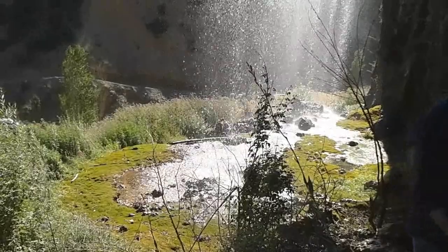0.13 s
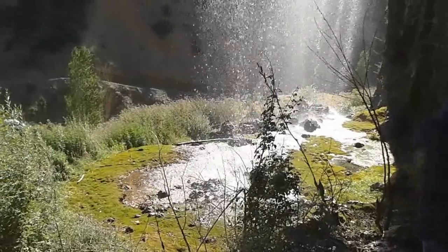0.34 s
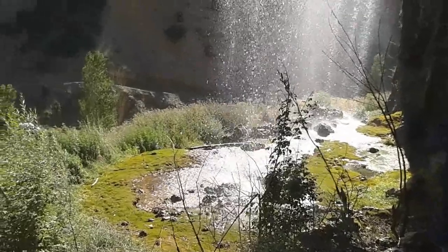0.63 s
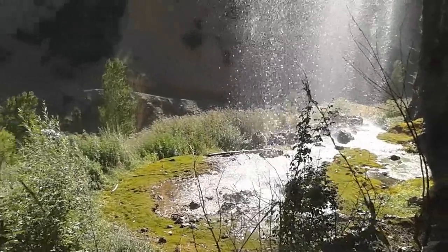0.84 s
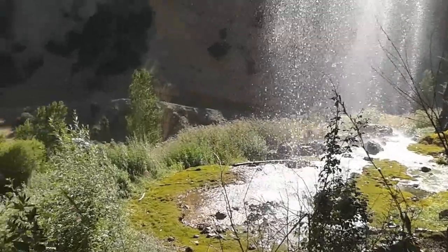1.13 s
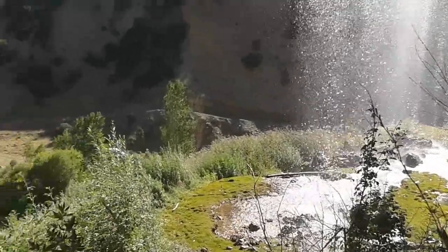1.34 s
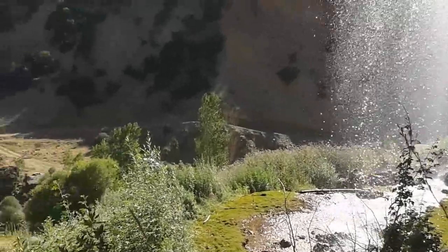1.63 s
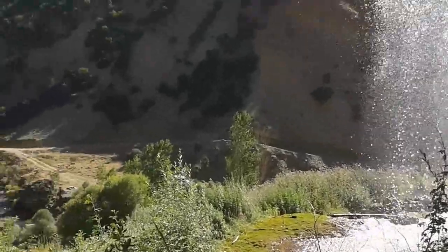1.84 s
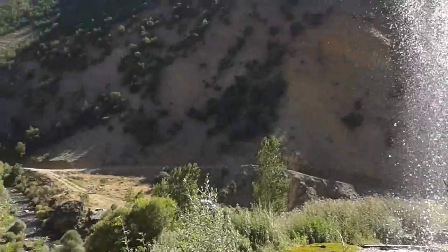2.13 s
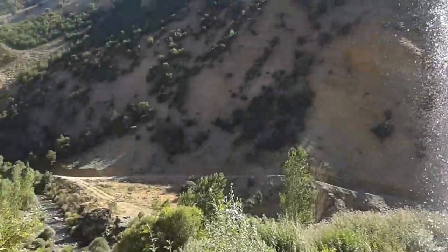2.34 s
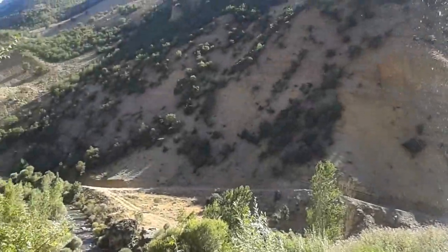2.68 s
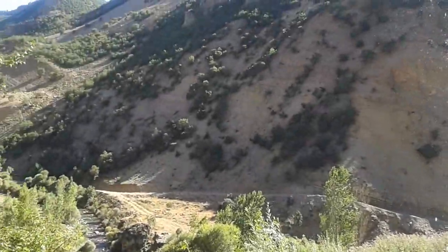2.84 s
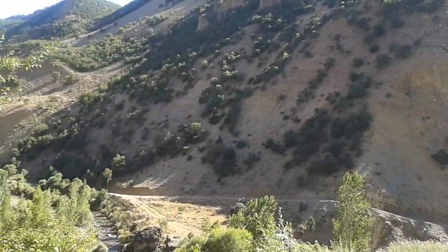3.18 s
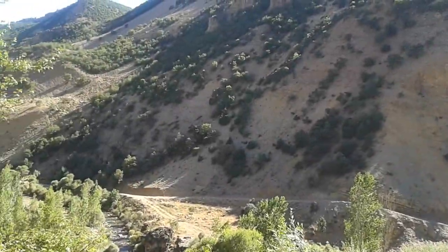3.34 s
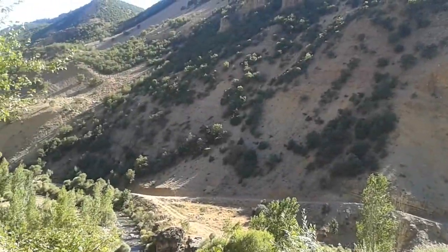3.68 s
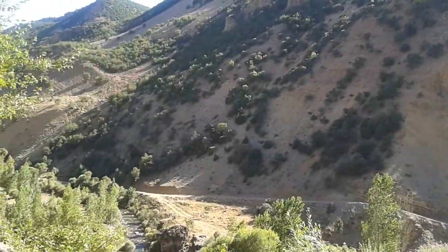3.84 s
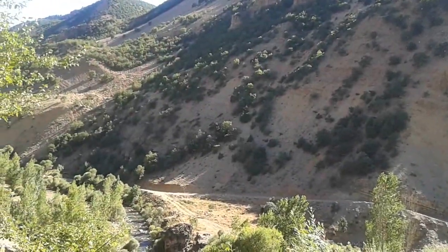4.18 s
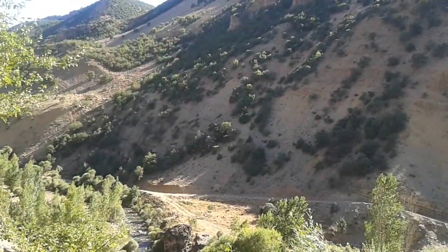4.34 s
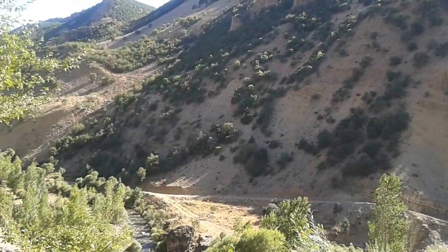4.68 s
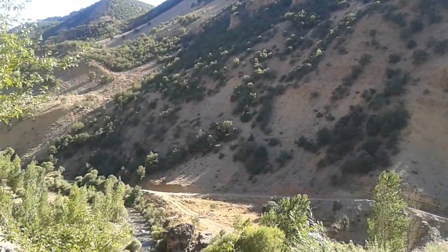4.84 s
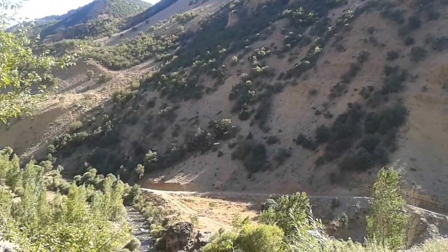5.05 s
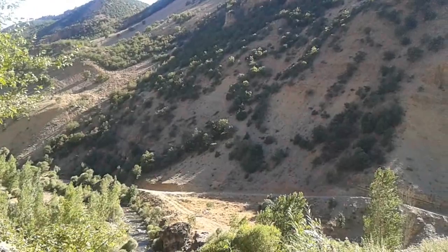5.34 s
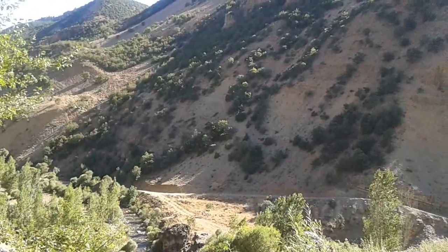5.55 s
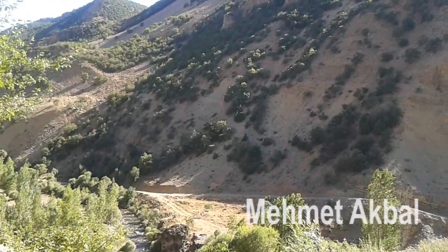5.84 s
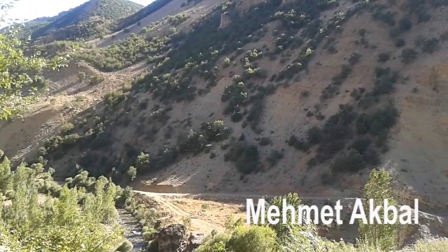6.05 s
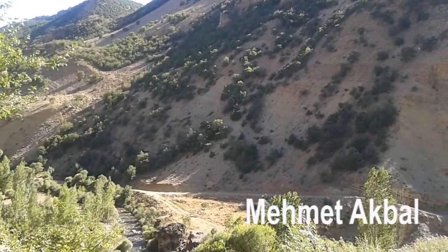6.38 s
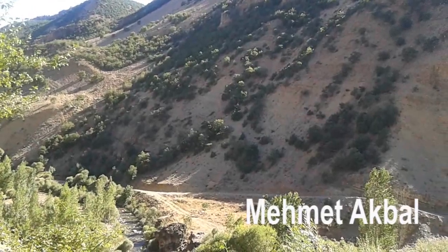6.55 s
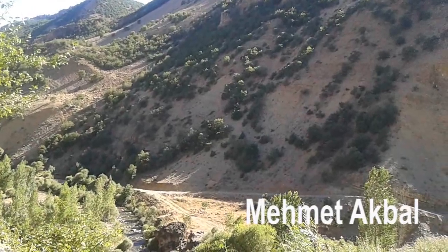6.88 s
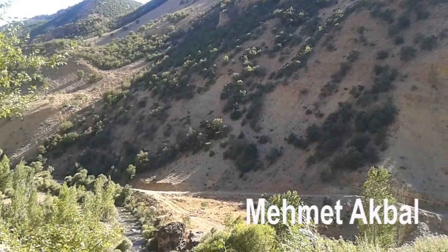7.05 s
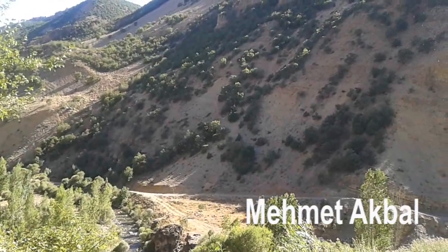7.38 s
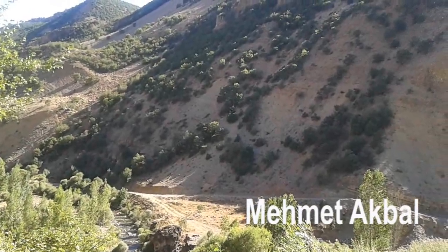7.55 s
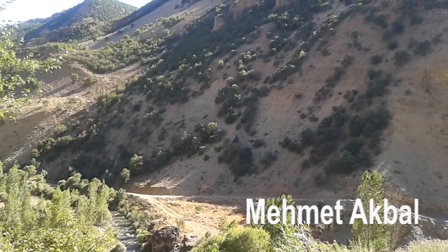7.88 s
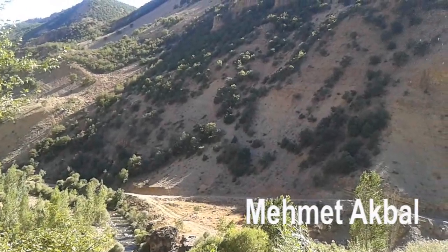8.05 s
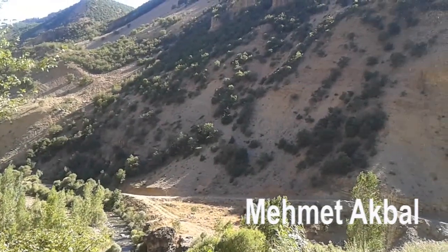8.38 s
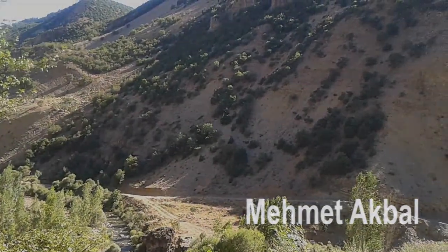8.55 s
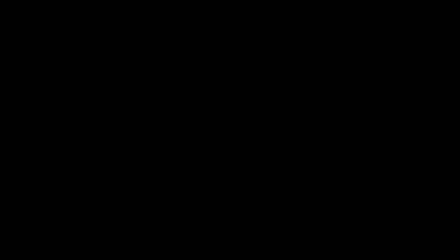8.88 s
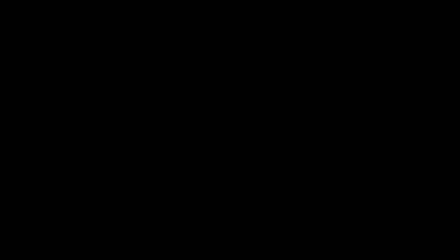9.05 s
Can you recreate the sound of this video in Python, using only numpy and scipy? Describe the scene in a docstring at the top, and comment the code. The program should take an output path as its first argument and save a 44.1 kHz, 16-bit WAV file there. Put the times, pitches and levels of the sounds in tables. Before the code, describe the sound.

Continuous outdoor waterfall noise, close enough to hear droplets crackle within the rush. Small wet slaps and brief bubble tones are buried in the hiss. The microphone swings from a rock face to an open hillside at around one second, changing the reflections while the flow stays even. Extremely faint low thumps lie underneath, practically masked. The second half is a long, even fade, with identical sound on both sides.

```python
"""Waterfall on rocks below a cliff

A tall thin fall breaks into spray on wet rocks and a shallow pool. Countless drops superpose into a hiss;
nearer ones patter as impulses, clumps slap as decaying noise, and trapped air rings as rising tones.
Reflections shift as the microphone turns from a rock wall in the first second and a half.
Very faint low pulses near 72 Hz lie under the water. The mono sound fades over the second half."""
import sys
import numpy as np
from scipy import signal
from scipy.fft import rfft, irfft
from scipy.io import wavfile
from scipy.ndimage import uniform_filter1d

SR = 44100
rng = np.random.default_rng(int(sys.argv[2]) if len(sys.argv) > 2 else 0)


def file_out(sig):
    """Save sig as 16-bit WAV at sys.argv[1]."""
    # one column per channel
    cols = np.atleast_2d(sig).T
    # limit, then scale
    lim = np.clip(cols, -1, 1)
    pcm = np.round(lim * 32767).astype(np.int16)
    wavfile.write(sys.argv[1], SR, pcm)


N = 406602
TIME = np.arange(N) / SR  # t/s

# spectral envelope of water landing on rock: f/Hz, relative level/dB
WATER_SPECTRUM = [(52, -67), (104, -27), (220, -13.5), (350, -10.5), (540, -12), (800, -5), (1700, 0.5),
                  (2900, -6.5), (4500, -0.0), (6500, -6), (8300, -11), (12000, -15.5), (13700, -18),
                  (15500, -19)]
# peaks and dips from reflections around the microphone:
# centre f/Hz, width f/Hz, level beside the wall/dB, level turned to the valley/dB
REFLECTIONS = [(1120, 230, -2.5, 1.3), (1322, 346, -4, -5), (1780, 290, -3.5, -1), (2410, 370, -0.5, 2.5),
               (2970, 400, 1, 0.25), (3406, 370, 2, 3.5), (4080, 300, 2.5, 2.5), (4720, 300, 1.5, 2),
               (5200, 440, 3, 3), (6220, 400, 5.5, 2), (7300, 500, 0.5, 2.5), (8730, 1400, -1.5, .6),
               (11900, 700, -2, -2.3), (13700, 900, 2, .8)]
# resonances of the gap beside the wall: first f/Hz, final f/Hz, level beside the wall/dB
GAP_RESONANCES = [(1880, 2370, 6.3), (4750, 5150, .8)]
# faint low pulses: t/s, peak level before the fade/dB
LOW_PULSES = [(.2, -66), (.68, -67), (1.735, -65), (2.57, -67), (3.25, -66), (4.09, -62), (4.68, -66),
              (5.75, -63), (6.6, -63), (7.16, -64)]

GAP_WIDTH_HZ, GAP_GLIDE_S = 360, 0.47  # resonance width; time constant of the upward glide
TURN_START_S, TURN_END_S = .95, 1.45  # the microphone swings from the wall to the valley
SPRAY_SHADE_DB, SPRAY_HZ, SPRAY_WIDTH_HZ = -0.7, 9800, 5100  # the wall screens off the finest spray
FALL_DB, FLUTTER_DB = -28, -82  # rms levels before the fade
PULSE_HZ, PULSE_S = 72, .016
FADE_START_S, FADE_END_S = 4.23, 9.605  # the end of the fade lies just beyond the end of the sound
TOP_HZ = 15650


def waterfall():
    """Superposition: mist, patter, slaps and bubbles add, then surge together with the uneven flow."""
    water = level(mist(flicker_db=0.41, flicker_rate=26), 0)
    water += level(impacts(per_second=2600, spread_db=4), -8.5)
    water += level(slaps(per_second=220, spread_db=3, decay_s=0.0028), -12)
    water += level(bubbles(lo_hz=801, hi_hz=9010, cycles=40, rise=0.092, spread_db=15.5, count=3000), -15.0)
    surge = undb(0.15 * walk(14))
    return level(colour(water * surge), FALL_DB)


def mist(flicker_db, flicker_rate):
    """Dense random arrivals tend to noise; each drop size has its own octave, with its own flurries."""
    spectrum = rfft(rng.standard_normal(N))
    hz = np.fft.rfftfreq(N, 1 / SR)
    octave = np.log2(np.maximum(hz, 125) / 125).astype(int)  # the lowest band takes all below 250 Hz
    hiss = np.zeros(N)
    for k in np.unique(octave):
        drops = irfft(spectrum * (octave == k), N)
        hiss += drops * undb(flicker_db * walk(flicker_rate))
    return hiss


def impacts(per_second, spread_db):
    """Random point process: clicks of either sign at independent moments, many small and a few large."""
    lands = rng.random(N) < per_second / SR
    size = undb(spread_db * np.minimum(rng.standard_normal(N), 2))
    return lands * size * rng.choice([-1, 1], N)


def slaps(per_second, spread_db, decay_s):
    """Exponential decay: bursting clumps add in power, each a sudden splash that dies in milliseconds."""
    hits = impacts(per_second, spread_db) ** 2
    power = signal.lfilter([1], [1, -np.exp(-2 / (decay_s * SR))], hits)
    return band(np.sqrt(power) * rng.standard_normal(N), 570, 15200)


def bubbles(lo_hz, hi_hz, cycles, rise, spread_db, count):
    """Damped resonance: air trapped in the pool rings, rising in pitch as it nears the surface."""
    out = np.zeros(N)
    for when, pitch, size in rng.random((count, 3)):
        hz = lo_hz * (hi_hz / lo_hz) ** pitch
        start, life = int(when * N), cycles / hz
        t = TIME[:min(int(life * SR), N - start)]
        tone = np.sin(2 * np.pi * hz * t * (1 + rise * t / life / 2))
        decay = np.exp(-np.log(100) * t / life)  # to a hundredth over its life
        # the factor hz lets small bubbles make up for their short life
        out[start:start + len(t)] += undb(spread_db * size) * hz * tone * decay
    return out


def colour(x):
    """Time-varying filtering: the water's spectrum meets reflections that shift as the microphone turns."""
    hz, s, frames = signal.stft(x, SR, nperseg=2048)
    hz = np.maximum(hz, 1)[:, None]
    water_hz, water_db = np.transpose(WATER_SPECTRUM)
    db = np.interp(np.log(hz), np.log(water_hz), water_db)
    near = nearness(s)
    for centre_hz, width_hz, wall_db, open_db in REFLECTIONS:
        db = db + (near * wall_db + (1 - near) * open_db) * bell(hz, centre_hz, width_hz)
    for first_hz, final_hz, gap_db in GAP_RESONANCES:
        centre_hz = final_hz + (first_hz - final_hz) * np.exp(-s / GAP_GLIDE_S)
        db = db + near * gap_db * bell(hz, centre_hz, GAP_WIDTH_HZ)
    db = db + near * SPRAY_SHADE_DB * bell(hz, SPRAY_HZ, SPRAY_WIDTH_HZ)
    return signal.istft(frames * undb(db), SR)[1][:N]


def nearness(s):
    """Linear interpolation of the wall's influence: 1 before the turn, 0 after it."""
    return np.clip((TURN_END_S - s) / (TURN_END_S - TURN_START_S), 0, 1)


def bell(hz, centre_hz, width_hz):
    """Lorentzian resonance curve, 1 at its centre and one half at the edges of its width."""
    return 1 / (1 + (2 * (hz - centre_hz) / width_hz) ** 2)


def low_pulses():
    """Amplitude modulation: faint low noise flutters, and sine tones swell and die under Gaussian envelopes."""
    flutter = undb(6 * np.minimum(walk(24), 1.5))
    out = level(band(rng.standard_normal(N), 75, 105) * flutter, FLUTTER_DB)
    for s, db in LOW_PULSES:
        tone = np.sin(2 * np.pi * (PULSE_HZ * TIME + rng.random()))
        out += undb(db) * tone * np.exp(-((TIME - s) / PULSE_S) ** 2)
    return out


def walk(rate):
    """Smoothed random process: about `rate` turns a second, scaled to an rms of 1."""
    k = max(int(SR / rate), 1)
    held = np.repeat(rng.standard_normal(N // k + 2), k)
    shifted = held[rng.integers(k):][:N]
    return level(uniform_filter1d(shifted, k), 0)


def band(x, lo_hz, hi_hz):
    """Band-pass filtering with gentle slopes."""
    return signal.sosfilt(signal.butter(2, [lo_hz, hi_hz], "band", fs=SR, output="sos"), x)


def level(x, db):
    """Normalisation to an rms level in decibels."""
    return x * undb(db) / np.sqrt(np.mean(x ** 2) + 1e-18)


def undb(db):
    """Logarithmic law: decibels to amplitude gain."""
    return 10 ** (np.asarray(db) / 20)


def scene():
    """Superposition of waterfall and low pulses, the same in both channels."""
    mono = waterfall() + low_pulses()
    return np.array([mono, mono])


def record(dry):
    """Linear amplitude fade, then low-pass filtering: the recorder cuts the top steeply."""
    fade = np.clip((FADE_END_S - TIME) / (FADE_END_S - FADE_START_S), 0, 1)
    low_pass = signal.ellip(12, .1, 80, TOP_HZ, fs=SR, output="sos")
    return signal.sosfilt(low_pass, dry * fade)


dry = scene()
out = record(dry)
file_out(out)
```